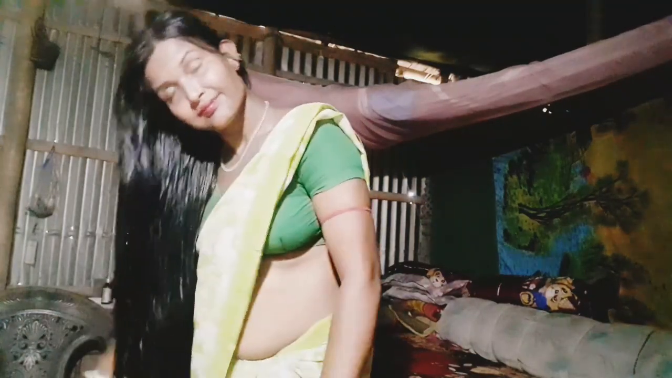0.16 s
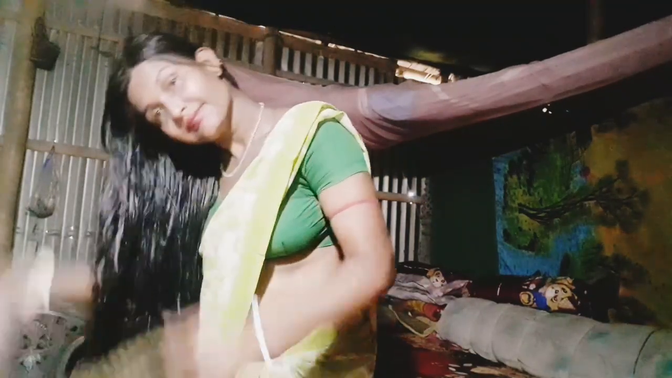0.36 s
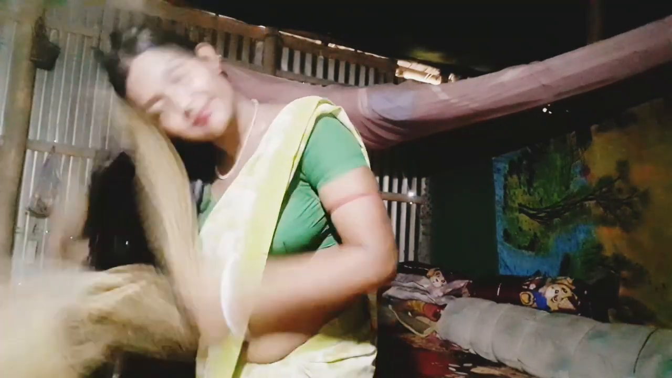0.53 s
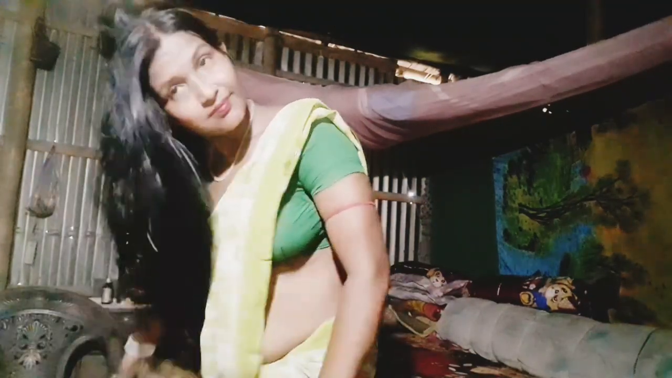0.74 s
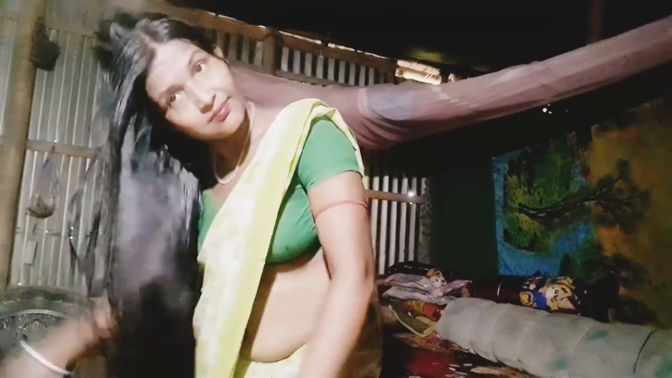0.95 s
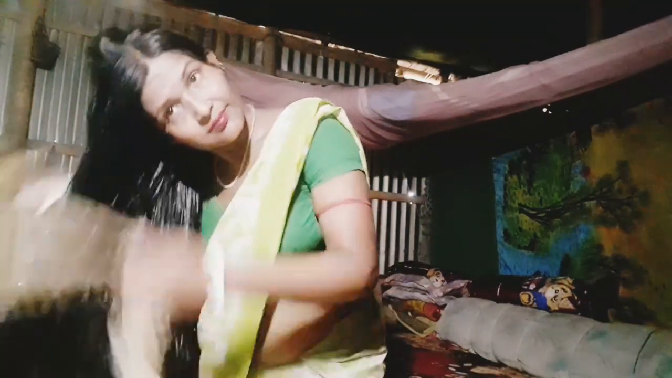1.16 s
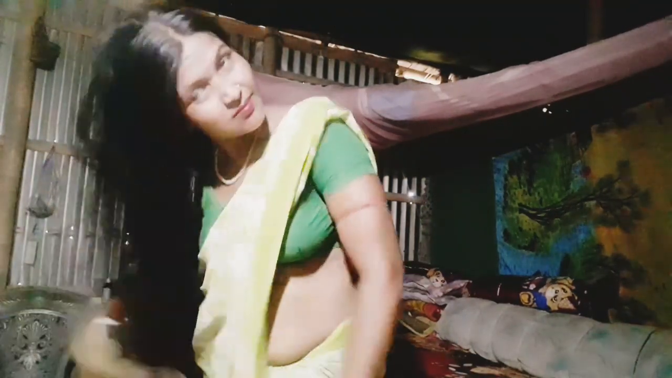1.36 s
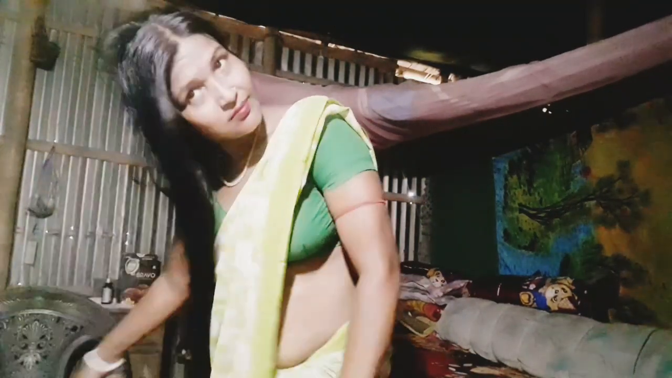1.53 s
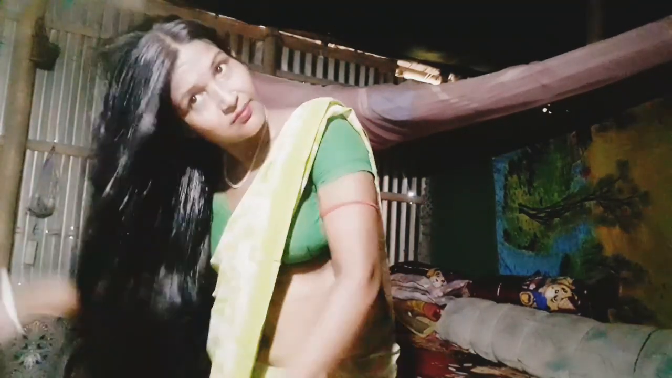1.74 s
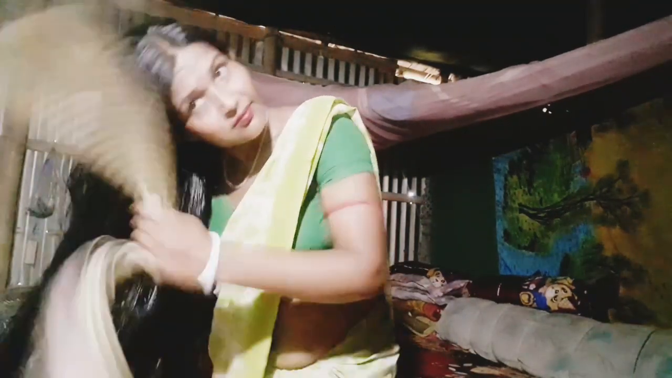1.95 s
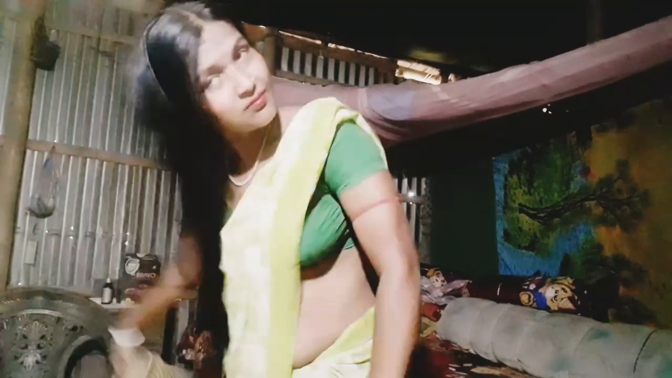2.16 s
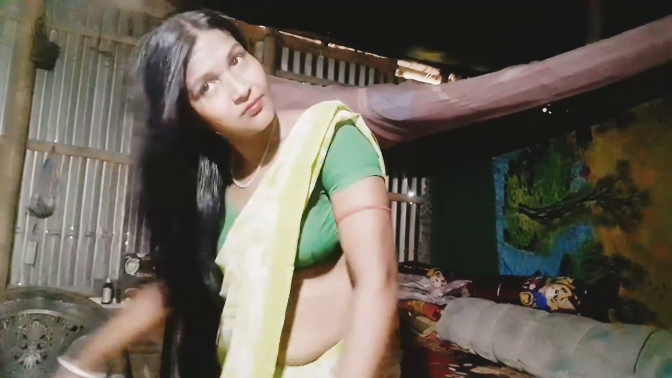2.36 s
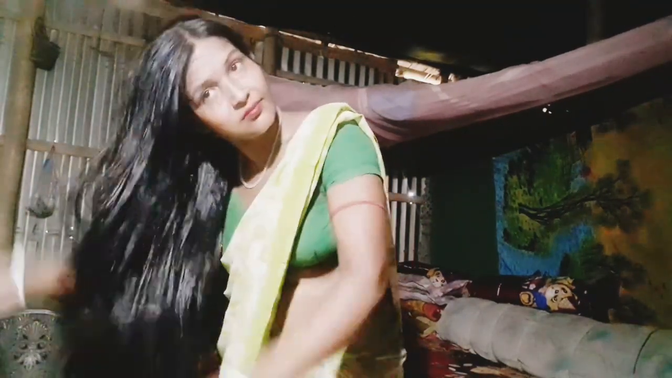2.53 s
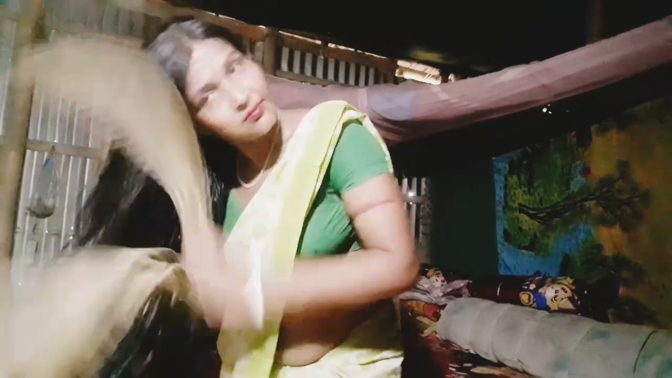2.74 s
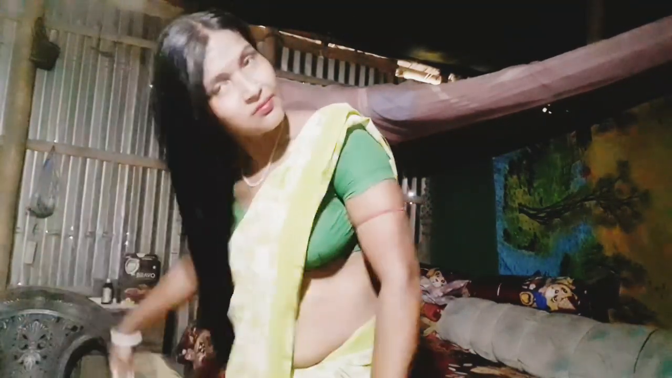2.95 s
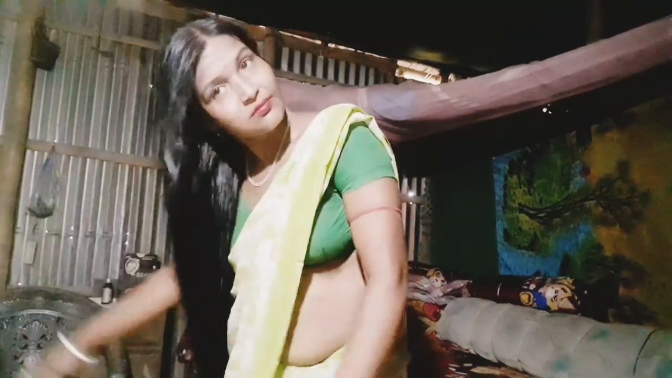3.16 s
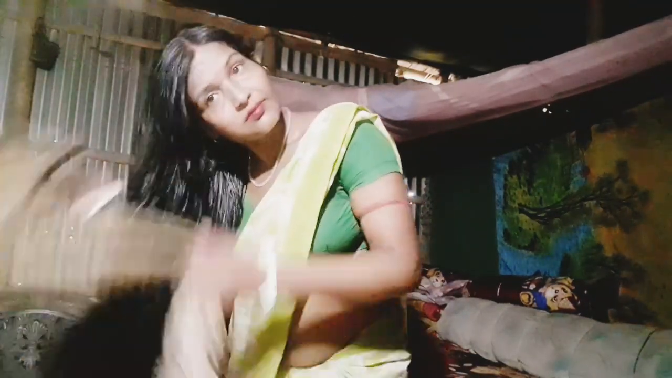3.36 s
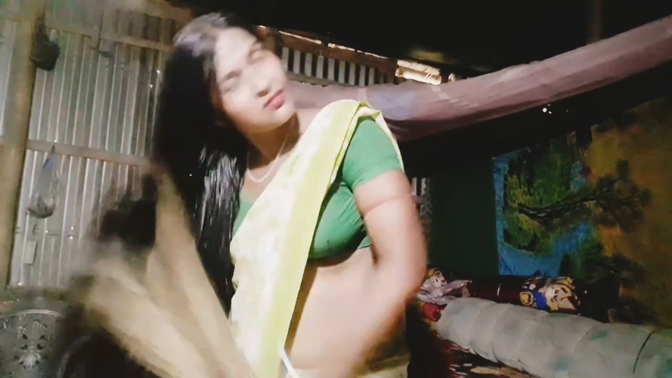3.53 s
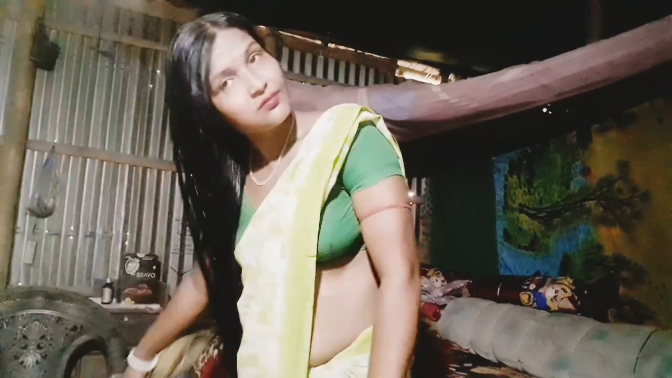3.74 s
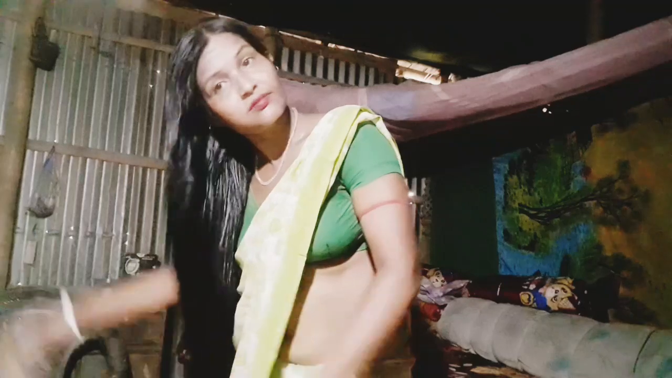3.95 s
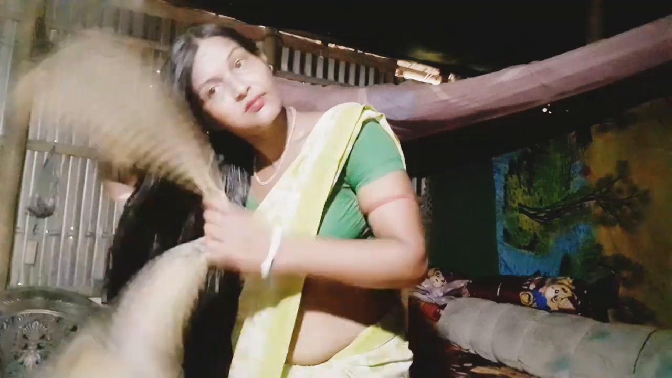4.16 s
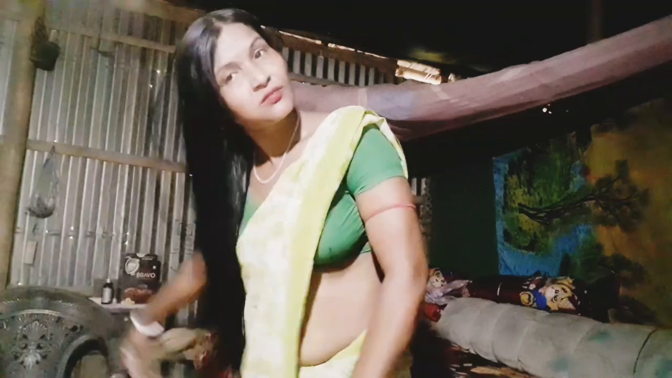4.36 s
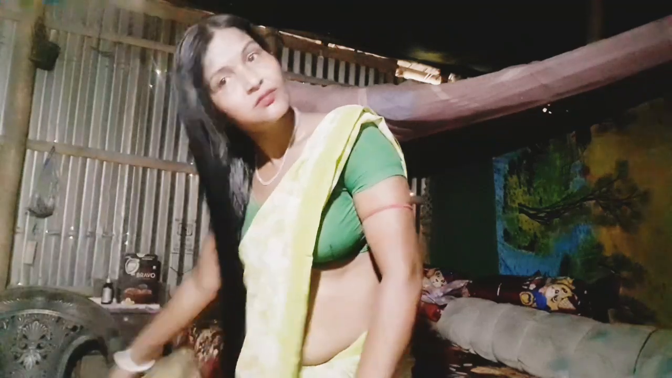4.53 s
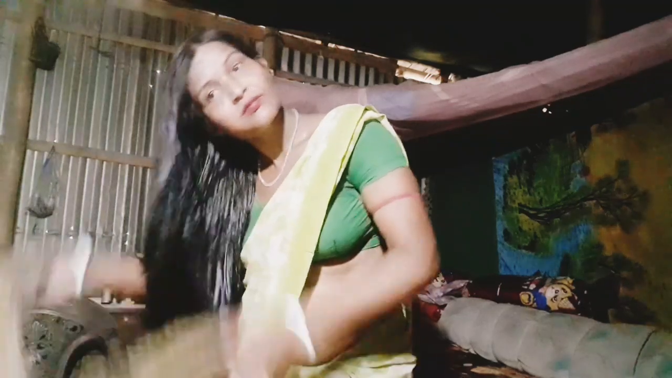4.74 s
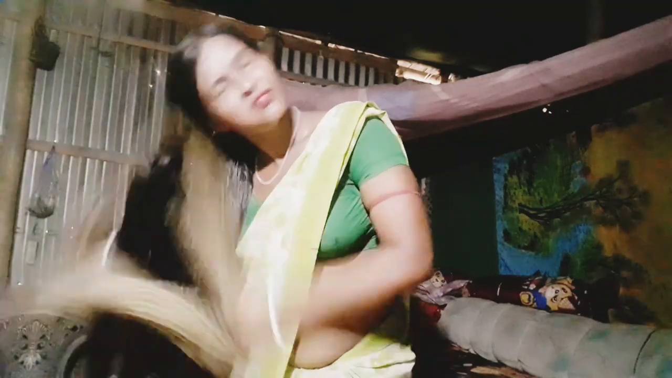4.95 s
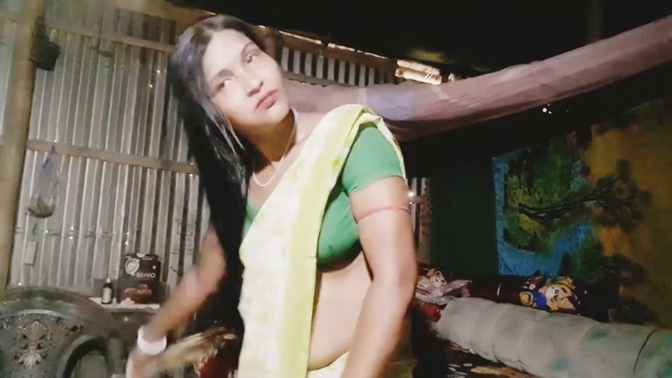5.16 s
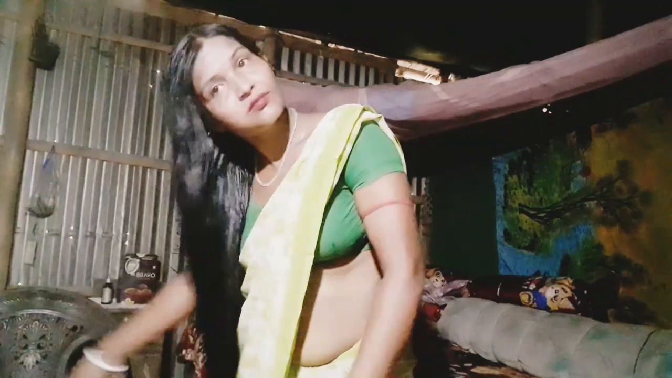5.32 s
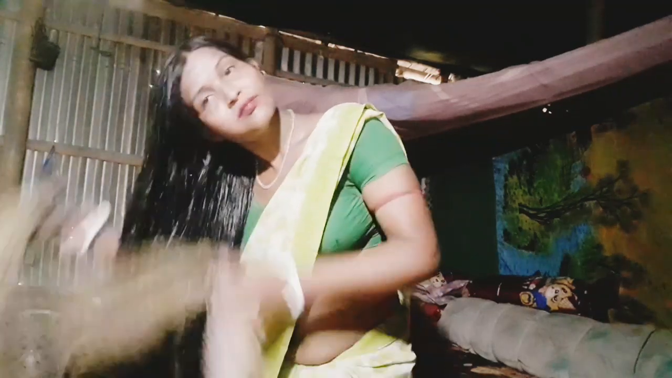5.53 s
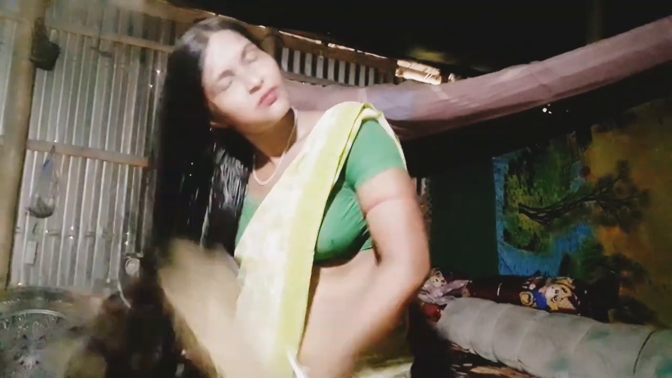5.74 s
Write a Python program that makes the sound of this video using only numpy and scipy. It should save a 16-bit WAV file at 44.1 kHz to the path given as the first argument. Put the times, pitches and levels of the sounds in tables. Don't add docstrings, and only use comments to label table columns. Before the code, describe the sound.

Eight sharp ripping slaps of cloth whipped through long wet hair, evenly spaced, over a low fan hum and faint insect trill.

```python
import sys
import numpy as np
from scipy import signal
from scipy.io import wavfile
from scipy.ndimage import uniform_filter1d

SR = 44100
rng = np.random.default_rng(int(sys.argv[2]) if len(sys.argv) > 2 else 0)


def to_wav(s):
    ch = np.atleast_2d(s).T
    pcm = np.round(np.clip(ch, -1, 1) * 32767)
    wavfile.write(sys.argv[1], SR, pcm.astype(np.int16))


def gain_from_db(level_db):
    decades = np.asarray(level_db, float) / 20
    return 10 ** decades


N = 259749
SINCE = np.arange(SR // 2) / SR

# frequency [Hz], density [dB per Hz].
SCRAPE_CURVE = [(710, -22.5), (1200, -10.5), (1350, -10), (1920, -13.5), (3400, -3), (3700, -3),
                (4080, -1.5), (4950, -3), (6070, -0.5), (6980, -3.5), (8550, -18), (11400, -5.5),
                (15600, -4.5)]
# start [s], jolt rise [s], jolt level [dB], time to rip [s], strain at rip [dB].
PULLS = [
    (0.511, 0.003, -43, 0.085, -31),
    (1.23, 0.0048, -44.5, 0.1, -32.5),
    (1.955, 0.01, -50.5, 0.12, -37.5),
    (2.734, 0.0066, -44, 0.08, -34.5),
    (3.398, 0.019, -62, 0.044, -52),
    (3.439, 0.0063, -44, 0.099, -32.5),
    (4.162, 0.0043, -44.5, 0.096, -33.5),
    (4.883, 0.0029, -42, 0.071, -39.5),
    (5.61, 0.004, -42, 0.1, -30.5),
]
# time [s], level [dB].
FAN_LEVEL = [(0.0, -46), (0.75, -47.5), (0.95, -48.5), (1.31, -49), (1.82, -51.5), (1.92, -51.5),
             (2.39, -53), (2.69, -47.5), (2.84, -45), (3.07, -48), (3.46, -46), (3.62, -50), (4.59, -48.5),
             (4.99, -47.5), (5.18, -47.5), (5.56, -46), (5.89, -47)]


def evened(x):
    return x / np.sqrt(np.mean(x ** 2) + 1e-20)


def along(rows, column=1):
    rows = np.asarray(rows)
    return np.interp(np.arange(N) / SR, rows[:, 0], rows[:, column])


def colour(x, points):
    f, db = np.transpose(points)
    hz = abs(np.fft.fftfreq(4096, 1 / SR))
    log_gain = np.log(gain_from_db(np.interp(np.log(hz + 1), np.log(f), db)))
    taps = np.fft.ifft(np.exp(np.conj(signal.hilbert(log_gain)))).real[:2048]
    return signal.oaconvolve(x, taps)[:len(x)]


def band(x, low_hz, high_hz):
    return signal.sosfilt(signal.butter(4, [low_hz, high_hz], "bandpass", fs=SR, output="sos"), x)


def low_pass(x, hz):
    return signal.lfilter(*signal.butter(2, hz, fs=SR), x)


def resonate(x, hz, width_hz):
    turn = np.exp(2j * np.pi * np.cumsum(hz * np.ones(len(x))) / SR)
    r = np.exp(-np.pi * width_hz / SR)
    return 2 * (turn * signal.lfilter([1 - r], [1, -r], x / turn)).real


def rung_noise(hz, width_hz):
    return resonate(resonate(rng.standard_normal(N), hz, width_hz), hz, width_hz)


def grains(per_s, spread_db):
    draw = rng.random((3, N))
    sign = np.sign(draw[0] - .5)
    return sign * (draw[1] < per_s / SR) * gain_from_db(-spread_db * np.log(draw[2] + 0.046))


def add(mix, s, sound):
    part = mix[round(s * SR):][:len(sound)]
    part += sound[:len(part)]


def summed(parts):
    power = np.zeros(N)
    for s, gain in parts:
        add(power, s, gain ** 2)
    return np.sqrt(abs(uniform_filter1d(power, size=90)))


def effort():
    # start [s], rise [s], peak [dB], hold [s], first brightness [dB].
    rips = [
        (0.576, 0.02, -22.5, 0.0066, 2),
        (0.621, 0.0055, -33.5, 0.0086, -4),
        (1.327, 0.003, -25.5, 0.036, 5.5),
        (2.065, 0.004, -31, 0.028, 0),
        (2.818, 0.013, -26, 0.046, -2.5),
        (3.537, 0.0046, -22.5, 0.045, -3),
        (4.258, 0.012, -30.5, 0.04, 3.5),
        (4.961, 0.0087, -30, 0.062, -3),
        (5.696, 0.0099, -27, 0.016, 3),
        (5.74, 0.0038, -28, 0.008, -18),
    ]
    jolt_fade_db_per_s, strain_db_per_s = 404, 338
    slack_db = -12.5
    rise_db, sag_db_per_s, fall_db_per_s = 15.5, 128, 378
    trail_db, trail_db_per_s = -28, 159
    dulls_s, late_top_db, dulls_db_per_s = 0.013, -1.5, 25
    rip_body_db, flap_db, flap_s = -11.5, -8, 0.022
    jolt, slack, strain, trail = (-18, 5), (-3, -8), (-10, -12), (-4, 0)

    t, phases = SINCE, []
    for s, rise, jolt_db, wait, strain_db in PULLS:
        on = (t < wait + .01) * np.minimum(t / rise, 1) ** 2
        fading_db = jolt_db - jolt_fade_db_per_s * np.maximum(t - rise, 0)
        building_db = strain_db + strain_db_per_s * np.minimum(t - wait, 0)
        phases.append((s, on * gain_from_db(fading_db), *jolt))
        phases.append((s, on * gain_from_db(jolt_db + slack_db), *slack))
        phases.append((s, on * gain_from_db(building_db), *strain))
    for s, rise, peak_db, hold, top_db in rips:
        after = np.maximum(t - rise, 0)
        late = np.maximum(after - hold, 0)
        db = peak_db - rise_db * np.maximum(1 - t / rise, 0)
        db = db - sag_db_per_s * (after - late) - fall_db_per_s * late
        top = late_top_db + (top_db - late_top_db) * np.exp(-after / dulls_s) - dulls_db_per_s * after
        body = flap_db + (rip_body_db - flap_db) * np.exp(-after / flap_s)
        phases.append((s, gain_from_db(db), top, body))
        phases.append((s, (late > 0) * gain_from_db(peak_db + trail_db - trail_db_per_s * late), *trail))
    return (summed([(s, gain) for s, gain, top, body in phases]),
            summed([(s, gain * gain_from_db(top)) for s, gain, top, body in phases]),
            summed([(s, gain * gain_from_db(body)) for s, gain, top, body in phases]))


def friction(slips):
    sound = colour(slips, SCRAPE_CURVE)
    return sound / np.std(band(sound, 2500, 7500))


def strokes(level, top_level, body_level):
    # frequency [Hz], density [dB per Hz].
    flap_curve = [(150, -7.5), (300, 0.5), (600, -1), (1200, -2), (2200, -13.5), (4000, -31.5)]
    clumps = gain_from_db(1.9 * evened(uniform_filter1d(rng.standard_normal(N), 110)))
    slips = evened(clumps * (evened(grains(6000, 2.2)) + 1.44 * rng.standard_normal(N)))
    scrape = friction(slips)
    top = signal.oaconvolve(scrape, signal.firwin(255, 8600, pass_zero=False, fs=SR), "same")
    even_top = top / np.std(band(scrape, 11700, 16900))
    flap = evened(colour(clumps * rng.standard_normal(N), flap_curve))
    return level * (scrape - top) + top_level * even_top + body_level * flap


def kicked(rows):
    t, kicks = np.arange(-66, 200) / SR, np.zeros(N)
    for (s, db), spray in zip(rows, rng.standard_normal((len(rows), 266))):
        cluster = spray * np.where(t < 0, np.exp(t / .0005), np.exp(-t / .0011))
        slip = np.sign(spray[0]) * (t == 0)
        add(kicks, s + t[0], gain_from_db(db - 1) * (slip + .4 * cluster))
    return kicks


def snaps(level):
    # time [s], peak [dB].
    large_snaps = [(0.5764, -17.4), (0.5863, -12.9), (0.5928, -10.3), (0.5966, -8.7), (0.6038, -9.7),
                   (0.6293, -16.0), (1.3327, -4.9), (1.3425, -11.4), (1.3639, -15.2), (2.0716, -15.5),
                   (2.0753, -17.0), (2.8283, -16.8), (2.8438, -13.7), (2.8633, -15.7), (2.8705, -17.5),
                   (3.541, -9.4), (3.5474, -8.3), (3.5522, -4.4), (3.585, -17.2), (4.2614, -9.0),
                   (4.266, -13.6), (4.9154, -30.0), (4.9683, -20), (4.9841, -18.2), (4.9983, -18.8),
                   (5.7045, -11.3), (5.7137, -11.8), (5.7458, -17.4), (5.7491, -14.5), (5.756, -16.5)]
    tick_s, tick_db = 0.00032, 19.5
    strays_per_s, stray_db = 57, 3.5
    ticks = kicked([(s + rise + tick_s, db + tick_db) for s, rise, db, wait, strain_db in PULLS])
    strays = gain_from_db(stray_db) * level * grains(strays_per_s, 1.5)
    kicks = kicked(large_snaps) + low_pass(ticks, 6000) + strays
    one_click = colour(1. * (SINCE == 0), SCRAPE_CURVE)
    return colour(kicks, SCRAPE_CURVE) / abs(one_click).max()


def thumps():
    # time [s], peak [dB], ring [Hz], sign of the first push [+1/-1], rattle share [ratio]. All rows
    # are the cloth pulling tight except the low 71.6 Hz one at 2.036 s, a puff of air.
    thuds = [(0.514, -23, 760, 1, 0.1), (0.621, -29, 310, -1, 0.64), (1.238, -30.5, 324, -1, 0.36),
             (1.964, -45, 790, 1, 0.33), (2.036, -43.5, 71.6, 1, 0.26), (2.092, -32.5, 523, 1, 0.6),
             (2.741, -25.5, 518, -1, 0.27), (2.796, -35.5, 400, -1, 0.22), (3.405, -36, 640, 1, 0.25),
             (3.445, -44, 400, 1, 0.65), (4.1665, -33.5, 574, 1, 0.24), (4.774, -36.5, 310, 1, 0.47),
             (4.887, -29, 760, 1, 0.22), (5.616, -31, 585, 1, 0.23)]
    t, out = np.arange(2600) / SR, np.zeros(N)
    for (s, db, hz, sign, rattle), noise in zip(thuds, rng.standard_normal((len(thuds), 2600))):
        push = 1.86 * np.sign(sign) * np.sin(2 * np.pi * hz * t) * np.exp(-1.6 * hz * t)
        rough = evened(resonate(noise, hz, .8 * hz))
        tail = rattle * rough * np.exp(-t / .009) * (1 - np.exp(-t / .0015))
        add(out, s, gain_from_db(db) * (push + tail))
    return band(out, 45, 3500)


def room(x):
    t = np.arange(9000) / SR
    taps = rng.choice([-1., 1.], 9000) * (rng.random(9000) < .06) * (t > .004)
    dull = uniform_filter1d(taps, size=12)
    tail = 0.72 * dull * gain_from_db(-60 * t / 0.39) + (taps - dull) * gain_from_db(-60 * t / 0.088)
    return signal.oaconvolve(x, tail / np.linalg.norm(tail))[:N]


def swishes():
    # start [s], length [s], rustle [dB], lower fold [dB].
    moves = [(0.0, 0.11, -64, -56), (0.25, 0.26, -57.5, -54), (0.74, 0.13, -74, -62),
             (0.858, 0.16, -73, -53.5), (1.08, 0.18, -79, -56.5), (1.48, 0.19, -65, -76),
             (2.18, 0.21, -67, -59.5), (2.692, 0.075, -60, -53), (2.964, 0.19, -63, -54),
             (3.25, 0.12, -73, -54), (3.69, 0.1, -64, -54), (4.078, 0.08, -58.5, -53),
             (4.402, 0.1, -71, -68), (4.516, 0.28, -65.5, -74), (4.768, 0.12, -60.5, -49),
             (5.117, 0.16, -65.5, -54.5), (5.365, 0.11, -62.5, -55), (5.462, 0.15, -67, -49.5)]
    rise_s, sag_db, end_s = 0.022, -7, 0.013
    brush, folds = [], []
    for s, length, brush_db, fold_db in moves:
        edge = np.clip(np.minimum(SINCE / rise_s, (length - SINCE) / end_s + 1), 0, 1)
        sag = sag_db * SINCE / length
        brush.append((s, edge * gain_from_db(brush_db + sag)))
        folds.append((s, edge * gain_from_db(fold_db + sag)))
    return summed(brush), summed(folds)


def rustle():
    brush_gain, fold_gain = swishes()
    brush = friction(evened(grains(9000, 2.1)) + 0.38 * rng.standard_normal(N))
    brush = signal.lfilter(*signal.butter(2, [2900, 7200], "bandpass", fs=SR), brush)
    folds = evened(band(evened(grains(3000, 1.5)) + rng.standard_normal(N), 1170, 2370))
    return gain_from_db(-3.0) * brush_gain * brush + gain_from_db(-10) * fold_gain * folds


def fan():
    # frequency [Hz], density [dB per Hz].
    air_curve = [(25, -37), (55, -16), (87, -9), (139, -10.5), (198, 1), (257, -7), (373, -8.5), (450, -11),
                 (950, -11.5), (1270, -15), (1620, -19), (1900, -27.5), (2450, -35.5), (2900, -41)]
    # frequency [Hz], width [Hz], level [dB].
    frame_modes = [(98.9, 22.5, -11), (197.5, 28.7, -2), (357.4, 49, -9.5)]
    frames, bins = N // 256 + 5, 513
    a, b, patches = rng.standard_normal((frames, bins, 3)).T
    patches = evened(uniform_filter1d(uniform_filter1d(patches, 10, 0), 14, 1))
    rush = signal.istft((a + 1j * b) * gain_from_db(1.4 * patches), nperseg=1024, noverlap=768)[1][:N]
    rush = colour(rush, air_curve + [(4500, -63.5)])
    rush = rush / np.std(band(rush, 120, 1700))
    hum = sum(gain_from_db(db) * evened(rung_noise(hz, width_hz)) for hz, width_hz, db in frame_modes)
    return gain_from_db(along(FAN_LEVEL)) * (gain_from_db(-3.5) * rush + gain_from_db(-5.5) * hum)


def chirps():
    # start [s], length [s], level [dB], wing pitch [Hz].
    trill = [(0.0, 0.053, -60, 10220), (0.08, 0.17, -60, 10250), (0.27, 0.27, -61.5, 10300),
             (0.548, 0.19, -59, 10210), (0.8, 0.18, -65.5, 10050), (0.93, 0.083, -70, 10470),
             (1.11, 0.3, -73, 10600), (1.4, 0.19, -71, 10040), (1.63, 0.26, -69.5, 10210),
             (1.91, 0.2, -63, 10180), (2.164, 0.17, -67, 10240), (2.39, 0.19, -68, 10130),
             (2.62, 0.21, -63, 10250), (2.96, 0.28, -68, 10250), (3.21, 0.12, -73, 10690),
             (3.53, 0.17, -68, 10000), (3.74, 0.19, -70, 10100), (3.955, 0.16, -64.5, 10250),
             (4.15, 0.18, -62, 10110), (4.37, 0.24, -66, 10290), (4.64, 0.21, -66, 10240),
             (5.17, 0.2, -66.5, 10420), (5.39, 0.23, -66.5, 10170), (5.62, 0.14, -61, 10200),
             (5.79, 0.13, -64.5, 10200)]
    swell_db, swell_share, stop_s, climb_hz = -12.5, 0.53, 0.046, 150
    parts, hz = [], np.zeros(N)
    for s, length, db, pitch_hz in trill:
        swell_s = swell_share * length
        swell = swell_db * np.maximum(1 - SINCE / swell_s, 0) ** 2
        parts.append((s, np.clip((length - SINCE) / stop_s, 0, 1) * gain_from_db(db + swell)))
        t = np.arange(N) / SR - s
        hz = np.where(t >= 0, pitch_hz + 60 - climb_hz * np.clip(1 - t / swell_s, 0, 1), hz)
    return summed(parts), hz


def insects():
    pulses_per_s = 105
    drift = 0.0417 * evened(uniform_filter1d(rng.standard_normal(N), 3000))
    turns = np.cumsum(pulses_per_s * (1 + drift)) / SR
    pulses = np.maximum(np.cos(2 * np.pi * turns) + 1.35, .35)
    gain, hz = chirps()
    rasp = evened(rung_noise(hz - 170, 620))
    tone = np.cos(2 * np.pi * np.cumsum(hz) / SR)
    lower_tone = np.cos(2 * np.pi * np.cumsum(hz - 300) / SR)
    near = gain * evened(pulses * (rasp + .8 * tone + .5 * lower_tone))
    far = gain_from_db(-75.5) * evened(rung_noise(11000, 1900))
    slow = uniform_filter1d(uniform_filter1d(rng.standard_normal(N), 1500), 1500)
    throb = gain_from_db(3.5 * evened(slow))
    low = gain_from_db(-79) * evened(throb * rung_noise(2276, 240))
    return band(near + far, 9300, 11650) + low


def hiss():
    # frequency [Hz], density [dB per Hz].
    night_curve = [(1500, -30), (2500, -5), (4500, -2), (6400, 0), (7300, -8), (8300, -22), (8900, -21),
                   (9600, -10), (11500, -9), (12200, -12.5), (15600, -6.5)]
    level_db = -69.5 + 0.89 * (along(FAN_LEVEL) + 49)
    return gain_from_db(level_db) * evened(colour(rng.standard_normal(N), night_curve))


def scene():
    level, top_level, body_level = effort()
    towel = gain_from_db(-1.5) * strokes(level, top_level, body_level) + snaps(level) + thumps()
    return (towel + gain_from_db(-14.5) * room(towel) + rustle() + fan() + hiss() + insects())[None]


def top_cut(x):
    return signal.sosfilt(signal.butter(12, 17140, fs=SR, output="sos"), x)


def record(dry):
    edge_hz = 15850
    cut = signal.lfilter(*signal.butter(2, 40, "high", fs=SR), dry)
    limiter = signal.firwin(511, edge_hz, window=("kaiser", 9), fs=SR)
    limited = signal.oaconvolve(cut, limiter[None], "same")
    return top_cut(limited)


dry = scene()
out = record(dry)
to_wav(out)
```